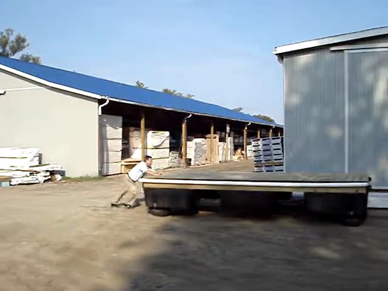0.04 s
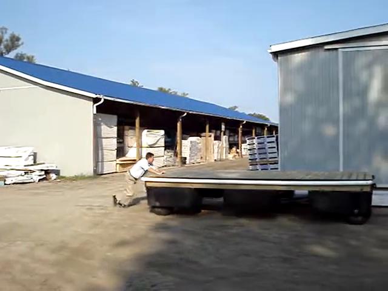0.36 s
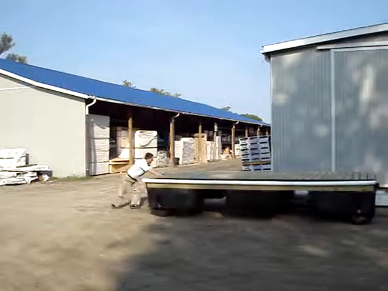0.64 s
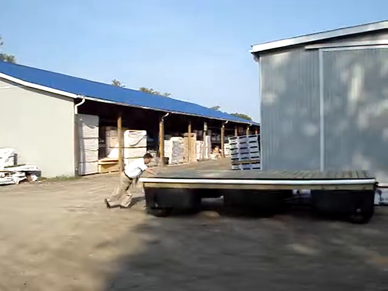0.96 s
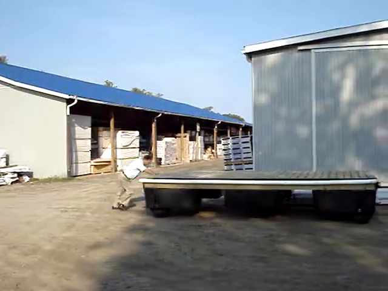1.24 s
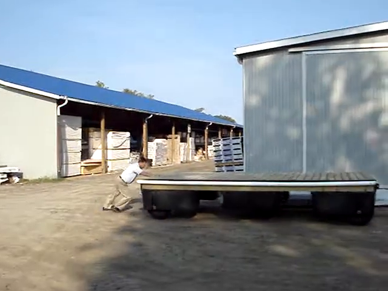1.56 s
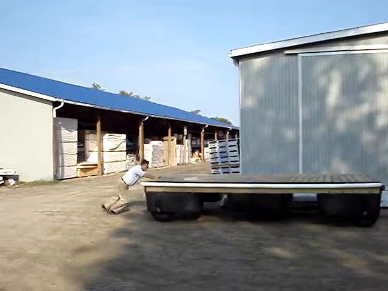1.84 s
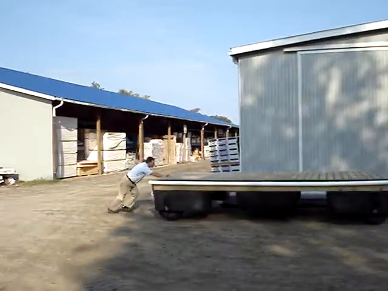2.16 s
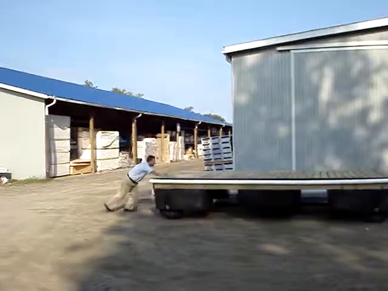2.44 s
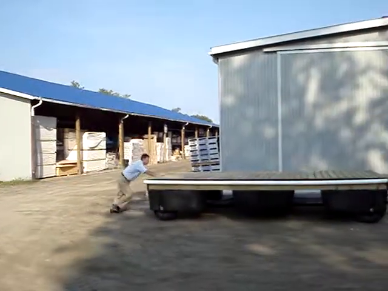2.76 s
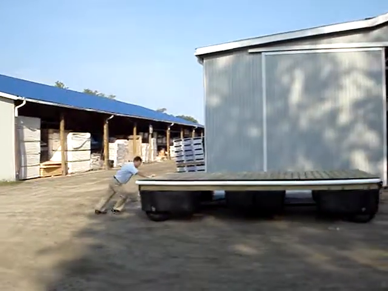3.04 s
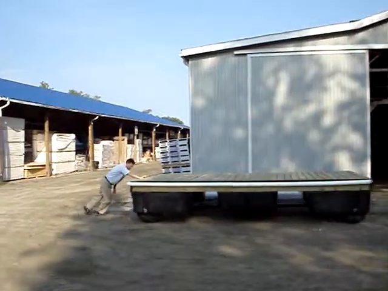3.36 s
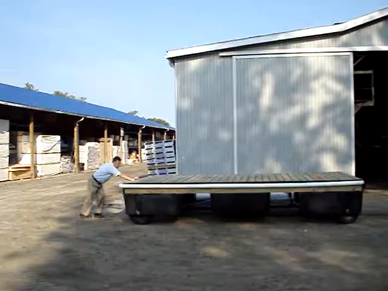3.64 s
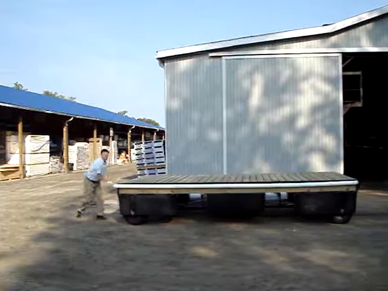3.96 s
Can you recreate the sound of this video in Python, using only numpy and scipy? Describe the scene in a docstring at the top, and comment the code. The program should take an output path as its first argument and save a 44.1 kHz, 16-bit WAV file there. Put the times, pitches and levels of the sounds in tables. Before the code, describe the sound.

Wheels rolling over gritty dirt, with crunching gravel, cracking stones and one hard hollow thump.

```python
"""Small wheels grind steadily over grit: a dock on hollow plastic floats is pushed across a dirt yard.
Stones snap and clumps of gravel crunch under the wheels and ring the floats; pebbles tick, wheels scrub.
Near the end one float takes a hard thump. The sheds throw the snaps, crunches and thumps back."""
import sys
import numpy as np
from scipy import signal
from scipy.fft import rfft, irfft
from scipy.io import wavfile
from scipy.ndimage import uniform_filter1d

SR = 44100
rng = np.random.default_rng(int(sys.argv[2]) if len(sys.argv) > 2 else 0)


def generate_wav(sig):
    """Save sig (samples, or channels by samples) to the path in sys.argv[1] as 16-bit PCM at SR."""
    pcm = np.round(np.clip(np.atleast_2d(sig).T, -1, 1) * 32767).astype(np.int16)
    wavfile.write(sys.argv[1], SR, pcm)


N = 176400
TIME_S = np.arange(N) / SR
EVENT_S = TIME_S[:SR // 2]

# yard reverberation: f/Hz, t60/s
YARD_DECAY = [(100, 1), (450, 0.44), (1200, 0.88), (4000, 0.9), (10000, 0.067)]
# shed echoes: delay/s, level/dB, f/Hz, width/Hz, t60/s
SHED_ECHOES = [(.055, -5, 420, 70, 0.23), (.085, -17.5, 490, 200, .08), (.108, -17.5, 505, 157, 0.13)]
# wheel scrubs: centre t/s, half-length/s, f/Hz, level/dB
WHEEL_SCRUBS = [(0.806, 0.026, 1270, -45), (0.85, 0.14, 1840, -52), (1.58, 0.25, 1420, -50.5),
                (2.46, 0.13, 1390, -49.5), (3.86, 0.043, 1520, -48)]
# rolling noise spectrum: f/Hz, density/dB
ROLL_SPECTRUM = [(15, -50), (25, -14.5), (59, -9), (160, -5.5), (239, -2), (356, -7.5), (494, -6.5),
                 (532, -2), (619, 0), (684, -1), (996, -5), (1420, -3.5), (1560, -9.5), (1910, -6),
                 (2220, -9.5), (3240, -11.5), (6700, -13.5), (8820, -17.5), (10000, -26), (13000, -91),
                 (22000, -120)]
# rolling noise gain per band: t/s, level/dB
ROLL_BASS = [(0, 3), (.15, 4.5), (.3, 6.5), (.55, 5), (.9, 0.5), (1.3, 3.5), (1.8, 2.5), (2.3, 0), (2.6, 1),
             (3.1, 3), (3.3, 1), (4, 1)]
ROLL_MIDDLE = [(0, 1), (.15, -3.5), (.36, 4), (.6, 0.5), (.85, 0), (1, -1), (1.25, 0), (1.6, -1),
               (1.8, 0.5), (2.05, 2), (2.3, -2), (2.7, -1.5), (2.92, -1.5), (3.1, 4), (3.3, -1.5),
               (3.75, -2.5), (3.88, 1), (4, -2)]
ROLL_TREBLE = [(0, -5), (.25, -2), (.38, -3.5), (.65, -1), (1, -1), (1.35, -8), (1.6, -1), (1.8, 1),
               (2.05, -2.5), (2.3, -4), (2.55, -5), (2.92, -4.5), (3.08, 0), (3.3, -6.5), (3.55, -3),
               (3.75, -5), (3.88, -1), (4, -6)]
# hollow float modes: f/Hz, level/dB, t60/s
FLOAT_MODES = [(195.5, -21.5, 0.23), (266.8, -13, 0.15), (379, -21.5, 0.12), (522, -4.5, 0.077),
               (596.6, 0, 0.048), (707, -1, 0.13), (830, -9, 0.057), (1103, -20, 0.16), (1214, -7.5, 0.086),
               (1268, -14.5, 0.07), (1456, -20, 0.053), (1930, -10, 0.048), (2080, -33, 0.04)]
# breaking stone spectrum: f/Hz, density/dB
STONE_SPECTRUM = [(40, -26), (150, -4), (280, -1), (410, -14), (680, 11.5), (930, -1.5), (1250, 3.5),
                  (1850, 1), (2300, -4), (3300, -0.5), (5000, -6.5), (8000, -10), (10000, -18)]
# gravel crunches: t/s, rise/s, fade/s, level/dB, bass/dB, treble/dB
GRAVEL_CRUNCHES = [(.009, 0.0044, 0.0052, -34.5, -6, -16), (.035, 0.011, 0.022, -37.5, -1, -11),
                   (.213, 0.0048, .012, -37, -2, -10), (.315, 0.012, 0.04, -33, 7, -4.5),
                   (.552, 0.0037, 0.01, -37, 9, -3), (.785, 0.0033, 0.0066, -39, 4, 4),
                   (.891, 0.0044, 0.0061, -33, -5, 14), (1.087, 0.0085, 0.014, -30.5, -2, 3.5),
                   (1.165, 0.02, 0.019, -32, 13, -7), (1.655, .015, 0.019, -33, 5.5, -5.5),
                   (1.70, 0.0055, 0.034, -33.5, -12, -15), (1.75, 0.015, 0.016, -37.5, 2, 7),
                   (2.0, 0.012, 0.012, -42, 11, 8), (2.158, 0.013, 0.0073, -42, 9, 14),
                   (2.2, 0.0043, 0.02, -41, 10, -7), (2.655, 0.019, 0.015, -36.5, 16.5, 4.5),
                   (2.788, 0.011, .016, -36.5, 24.5, 16), (2.972, 0.0063, 0.0071, -26, -8, -8.5),
                   (2.982, 0.0038, 0.019, -21.5, -1, -6.5), (3.03, 0.067, 0.044, -41.5, -16, -5.5),
                   (3.508, 0.0088, 0.017, -32.5, 12, 0.5), (3.598, 0.0061, .018, -48, -2, -3),
                   (3.944, 0.0039, 0.0058, -40, 18, 8)]
# stone snaps: t/s, level/dB, bass/dB, treble/dB, ring f/Hz, ring/dB, float/dB
STONE_SNAPS = [(.2195, -17, 19, 8, 1250, 1, 10), (.337, -13.5, 7, -6, 1110, 4, -3),
               (.346, -15, -3, 3, 1290, -2, -7), (.880, -10.5, -7, 3, 1930, -3.5, -20),
               (.8895, -7.5, -9, 8, 705, -1, -3), (.896, -9.5, -13, 5, 3170, -24, -16),
               (1.0935, -14, 5, -17, 1040, 7.5, 4), (1.1578, -4.5, 14, 8, 1807, 7, 4.5),
               (1.167, -10.5, 1, 9, 3340, 4, -13), (1.2812, 2.5, -14, -1.5, 1545, -4, 1),
               (1.3288, -3.5, 1, -4, 1400, -23, -5), (1.3792, -0.5, -26, -2.5, 1270, 2, -0.5),
               (1.699, -2.5, -11, 5, 623, 2.5, -18), (1.7173, -7, 10.5, 9.5, 1080, 1.5, -5),
               (1.756, -10, 7, 10, 1200, -1, -3), (1.7645, -15, -16, 3, 3160, 0, -7),
               (2.477, -17.5, 2.5, -18, 1230, 4, -5), (2.767, -17, -5, 6, 1510, -15, -4),
               (2.793, -15.5, -2, 3, 790, -3, -7), (2.9865, -13, 0, -7, 996, 7.5, -13),
               (3.143, -21, 10, -11, 1070, 9, -14), (3.325, -16.5, 4, -8.5, 1300, -2, -6),
               (3.601, -21, 8, -4, 750, 6, 0), (3.609, -12.5, -7, 8, 780, 5, -11),
               (3.842, -21, 0, -11, 1300, 13.5, -10), (3.860, -20, -12, -2, 1280, 8, 4),
               (3.879, -12, 1, -4, 1340, 0, -11), (3.9285, -9, 2, 3, 1220, -3, 1.5)]
# contact knock spectrum: f/Hz, density/dB
KNOCK_SPECTRUM = [(25, -29), (120, -4), (400, -0.5), (700, 8.5), (1250, 7), (1900, -2), (2800, -9.5),
                  (5000, -25), (10000, -34)]
# blows on a float: t/s, level/dB, contact/ms, boom f/Hz, boom/dB, shove/dB
FLOAT_THUMPS = [(1.166, -15, .3, 175, 7.5, -17), (2.986, -9, 0.14, 136, 4, -18),
                (3.4040, 14.5, 0.11, 122, -21.5, -18)]


def amp(db):
    """Decibels to gain."""
    return 10 ** (np.asarray(db) / 20)


def unit_rms(x):
    """Scale to rms 1."""
    return x / np.sqrt(np.mean(x ** 2) + 1e-20)


def unit_energy(x):
    """Scale to energy 1."""
    return x / np.sqrt(np.sum(x ** 2) + 1e-20)


def curve_at(points, hz):
    """Interpolate on a log-frequency axis."""
    points_hz, values = np.transpose(points)
    return np.interp(np.log(hz + 1), np.log(points_hz + 1), values)


def add(mix, start_s, sound):
    """Mix a sound in at start_s."""
    part = mix[max(round(start_s * SR), 0):][:len(sound)]
    part += sound[:len(part)]


def convolve(x, response):
    """Convolve, keeping the length of x."""
    return signal.fftconvolve(x, response)[:len(x)]


def shelves(hz, bass_hz=390, treble_hz=2130):
    """Bass and treble share per frequency."""
    return 1 / (1 + (hz / bass_hz) ** 6), 1 - 1 / (1 + (hz / treble_hz) ** 6)


def colour(x, spectrum, bass_db=0, treble_db=0):
    """Minimum-phase filter of unit energy: spectrum plus two shelves."""
    hz = abs(np.fft.fftfreq(2048, 1 / SR))
    low, high = shelves(hz)
    log_gain = np.log(amp(curve_at(spectrum, hz) + bass_db * low + treble_db * high))
    response = np.fft.ifft(np.exp(np.conj(signal.hilbert(log_gain)))).real
    return convolve(x, unit_energy(response[:len(hz) // 2]))


def resonate(x, hz, width_hz):
    """One band-pass resonance."""
    return signal.lfilter(*signal.iirpeak(hz, hz / width_hz, SR), x)


def decay(t60_s):
    """Exponential decay."""
    return np.exp(-np.log(1000) * EVENT_S / t60_s)


def mode(hz, t60_s):
    """Damped sine."""
    return np.sin(2 * np.pi * hz * EVENT_S) * decay(t60_s)


def noise_burst(t60_s):
    """Decaying white noise, energy 1."""
    return unit_energy(rng.standard_normal(len(EVENT_S)) * decay(t60_s))


def grains(per_s, spread_db, size=len(EVENT_S)):
    """Random tiny clicks, a few large."""
    strength = amp(spread_db * np.minimum(rng.exponential(1, size), 4))
    return unit_rms(strength * rng.choice([-1, 1], size) * (rng.random(size) < per_s / SR))


def yard(x, tail_db=-18, onset_s=0.01):
    """Thin open-air tail plus dull, ringing echoes from metal sheds."""
    hz, frame_s, bins = signal.stft(rng.standard_normal(SR), SR, nperseg=256)
    bins = bins * np.exp(-np.log(1000) * frame_s / curve_at(YARD_DECAY, hz)[:, None])
    tail = signal.istft(bins, SR, nperseg=256)[1]
    onset = np.minimum(np.arange(len(tail)) / SR / onset_s, 1)
    response = amp(tail_db) * unit_energy(tail * onset)
    for delay_s, db, hz, width_hz, t60_s in SHED_ECHOES:
        add(response, delay_s, amp(db) * resonate(noise_burst(t60_s), hz, width_hz))
    return convolve(x, response)


def pebbles(db=-55):
    """Single small pebbles tick at random."""
    tick = noise_burst(t60_s=0.019)
    tick[0] += 1
    ticks = convolve(grains(per_s=280, spread_db=4.5, size=N), tick)
    return amp(db) * unit_rms(colour(ticks, STONE_SPECTRUM, bass_db=-8, treble_db=14))


def scrubs(width_hz=220):
    """A wheel slides briefly sideways: narrow rasp."""
    out = np.zeros(N)
    for centre_s, half_s, hz, db in WHEEL_SCRUBS:
        rasp = resonate(rng.standard_normal(N), hz, width_hz)
        rasp = unit_rms(resonate(rasp, hz, 2 * width_hz))
        out += amp(db) * rasp * np.exp(-2 * ((TIME_S - centre_s) / half_s) ** 2)
    return out


def rolling(base_db=-42.5, grain_share=0.47):
    """Grit and packed dirt under the wheels: dense grains over a rumble, flickering in three bands."""
    drive = np.sqrt(grain_share) * grains(per_s=4000, spread_db=3, size=N)
    drive += np.sqrt(1 - grain_share) * rng.standard_normal(N)
    spectrum = rfft(unit_rms(colour(drive, ROLL_SPECTRUM)))
    low, high = shelves(np.fft.rfftfreq(N, 1 / SR))
    bands = [(low, ROLL_BASS, 1.25), (1 - low - high, ROLL_MIDDLE, 1.25), (high, ROLL_TREBLE, 0.6)]
    out = np.zeros(N)
    for share, levels, flicker_db in bands:
        flicker = unit_rms(uniform_filter1d(rng.standard_normal(N), size=900))
        gain_db = np.interp(TIME_S, *np.transpose(levels)) + flicker_db * flicker
        out += irfft(spectrum * share, N) * amp(gain_db)
    return amp(base_db) * out


def float_ring(scatter_db=0, swell_cycles=1.8):
    """Float modes build up over a few cycles; their balance varies with the spot struck."""
    ring = np.zeros(len(EVENT_S))
    for hz, db, t60_s in FLOAT_MODES:
        swell = 1 - np.exp(-EVENT_S * hz / swell_cycles)
        ring += amp(db + scatter_db * rng.standard_normal()) * mode(hz, t60_s) * swell
    return unit_energy(ring)


def crunch(rise_s, fade_s, db, bass_db, treble_db, float_db=-13):
    """A gravel clump gives way: a burst of small cracks rings the float."""
    cracks = grains(per_s=4500, spread_db=1)
    envelope = np.minimum(EVENT_S / rise_s, 1) * np.exp(-np.maximum(EVENT_S - rise_s, 0) / fade_s)
    burst = unit_energy(cracks * envelope) * np.linalg.norm(envelope)
    body = amp(float_db) * convolve(burst, float_ring(scatter_db=11.5))
    return amp(db) * (colour(burst, STONE_SPECTRUM, bass_db, treble_db) + body)


def snap(db, bass_db, treble_db, ring_hz, ring_db, float_db, trim_db=-2.5):
    """A stone breaks: ragged crack, spray of splinters, short ring of wheel and float."""
    splinters = amp(-4.5) * unit_energy(grains(per_s=6000, spread_db=1) * decay(t60_s=0.14))
    crack = splinters + amp(1.5) * noise_burst(t60_s=0.0084)
    crack[0] -= 0.8  # leading click
    body = amp(float_db) * unit_energy(float_ring(scatter_db=7.5) * decay(t60_s=0.082))
    ring = amp(ring_db) * unit_energy(mode(ring_hz, t60_s=0.03)) + body
    return amp(db + trim_db) * (colour(crack, STONE_SPECTRUM, bass_db, treble_db) - 0.78 * ring)


def thump(db, contact_ms, boom_hz, boom_db, shove_db, rattle_db=-10, click_db=-7.5):
    """A jolt rings the float, rattles its mounting, booms the deck and shoves the air."""
    knock = amp(rattle_db) * noise_burst(t60_s=0.097)
    knock[0] -= amp(click_db)
    force = np.exp(-EVENT_S * 1000 / contact_ms)
    ring = convolve(float_ring(), force / force.sum())
    boom = amp(boom_db) * unit_energy(mode(boom_hz, t60_s=0.15))
    shove = amp(shove_db) * unit_energy(mode(hz=42, t60_s=0.031))
    return amp(db) * (colour(knock, KNOCK_SPECTRUM) - ring + boom - shove)


def scene():
    """Snaps, crunches and thumps echo in the yard over dry wheel noise."""
    hits = np.zeros(N)
    for events, source in [(STONE_SNAPS, snap), (GRAVEL_CRUNCHES, crunch), (FLOAT_THUMPS, thump)]:
        for start_s, *settings in events:
            add(hits, start_s, source(*settings))
    return (hits + yard(hits) + rolling() + pebbles() + scrubs())[None]


def record(dry, cutoff_hz=10260):
    """Steep low-pass."""
    lowpass = signal.firwin(511, cutoff_hz, window=("kaiser", 9), fs=SR)
    return signal.oaconvolve(dry, lowpass[None], "same")


dry = scene()
out = record(dry)
generate_wav(out)
```